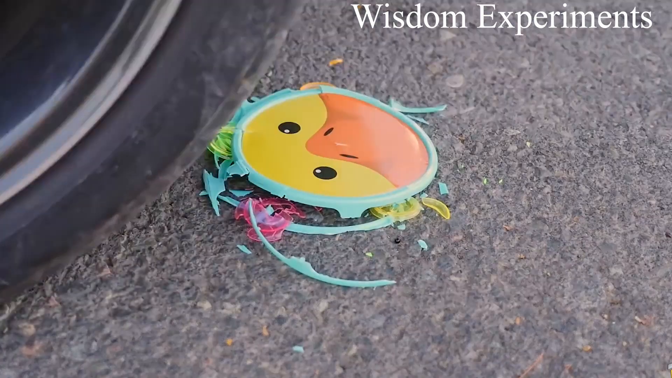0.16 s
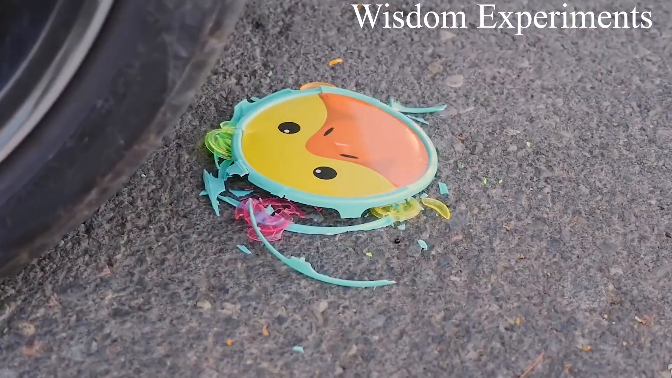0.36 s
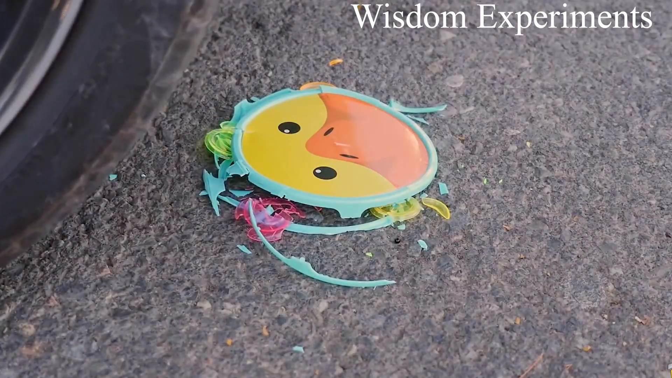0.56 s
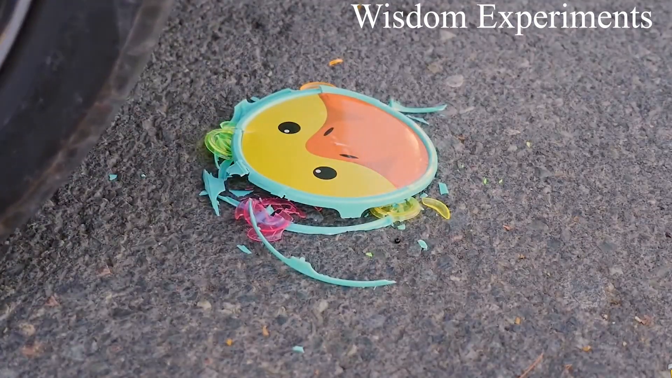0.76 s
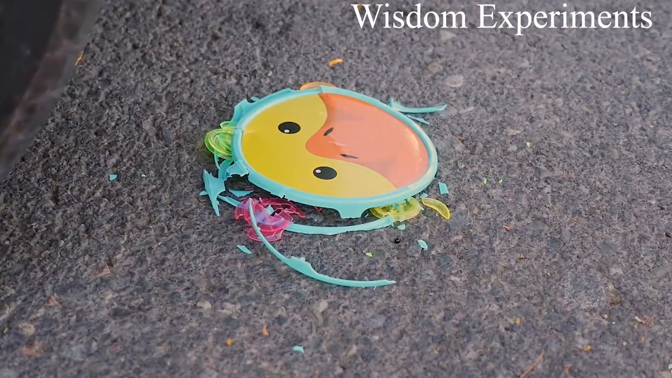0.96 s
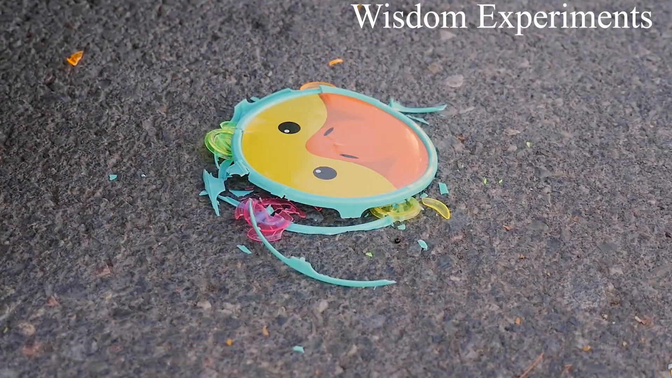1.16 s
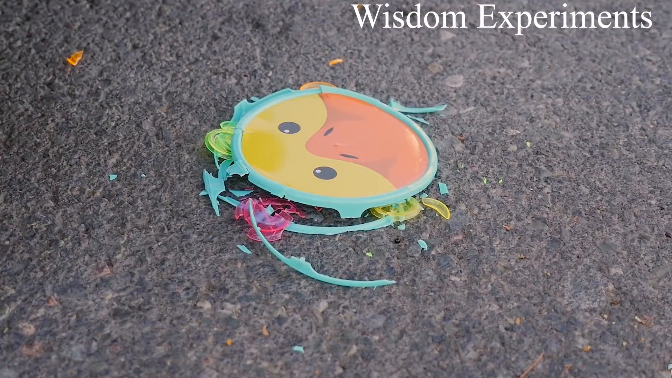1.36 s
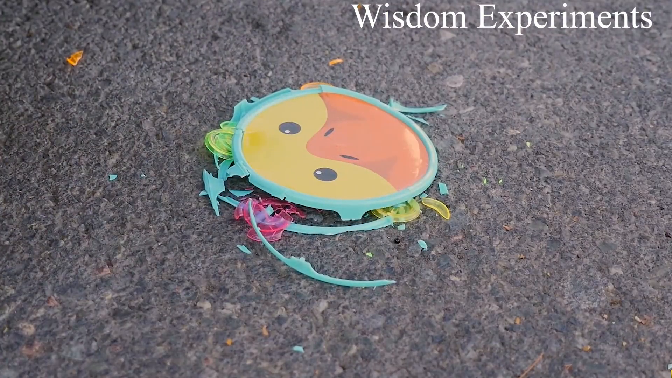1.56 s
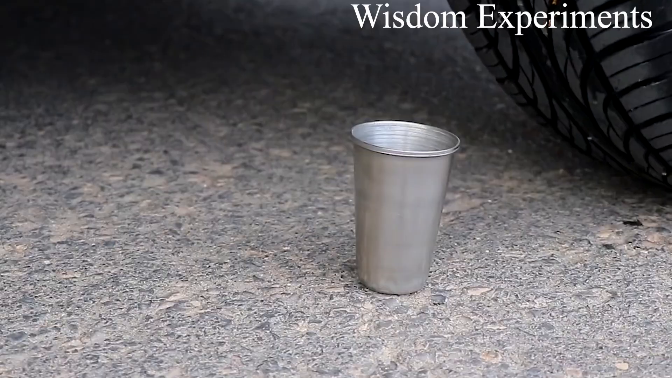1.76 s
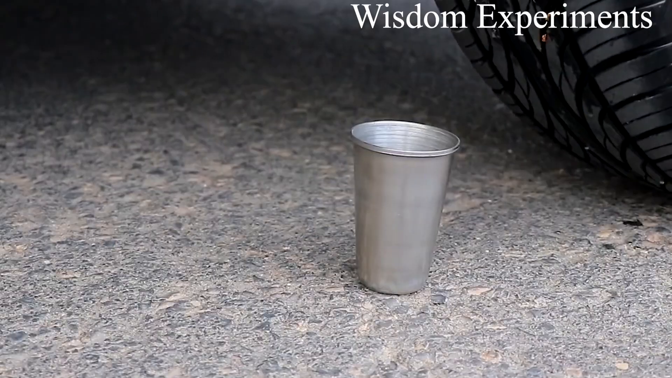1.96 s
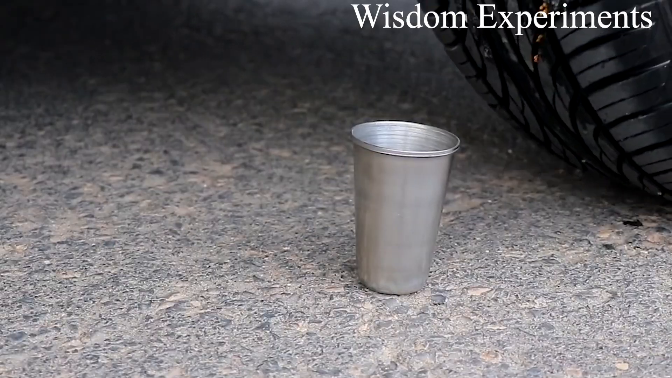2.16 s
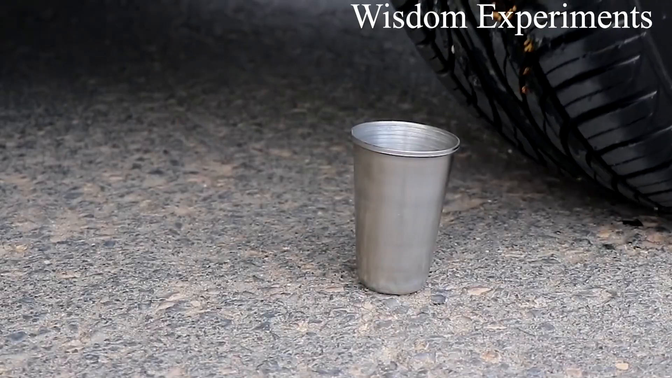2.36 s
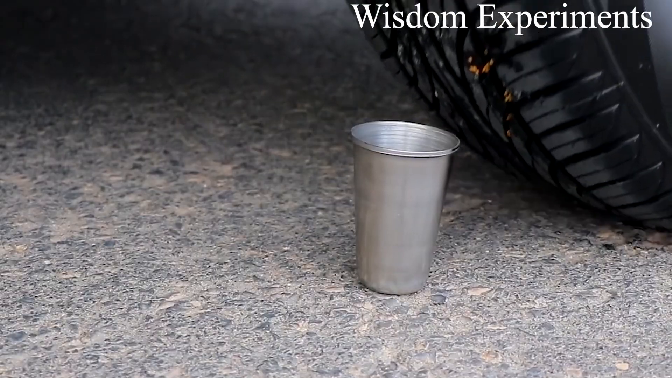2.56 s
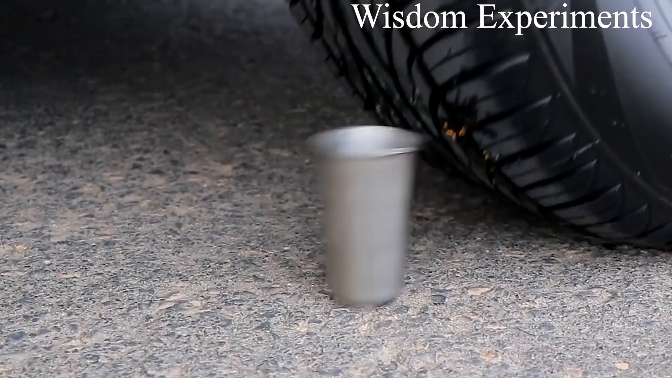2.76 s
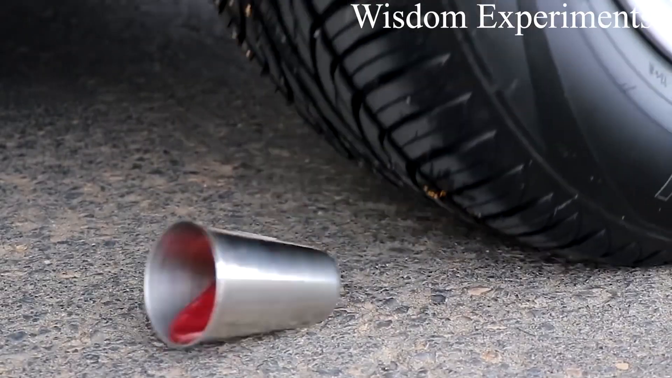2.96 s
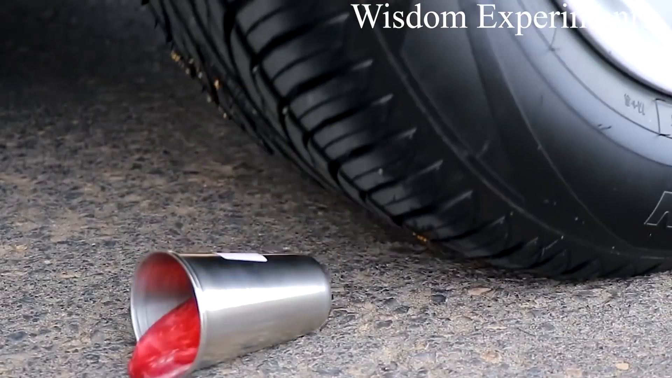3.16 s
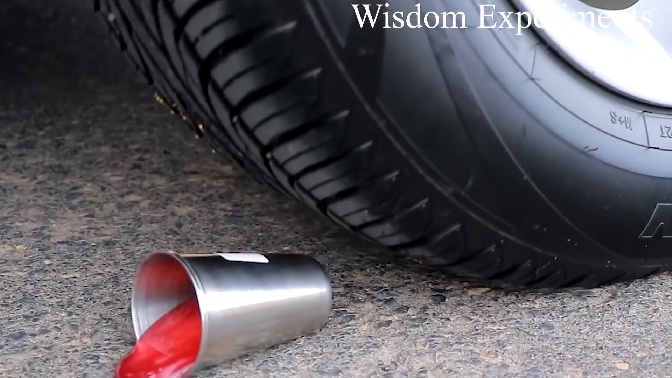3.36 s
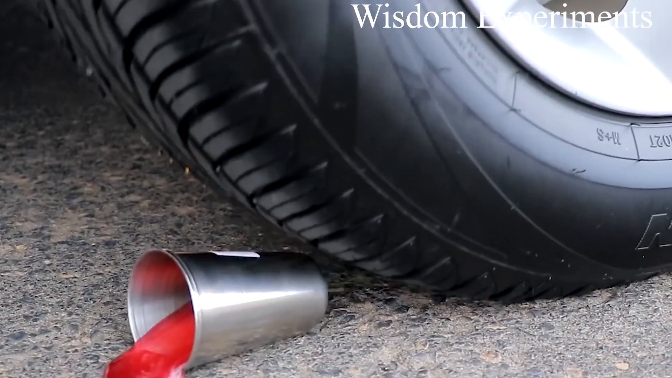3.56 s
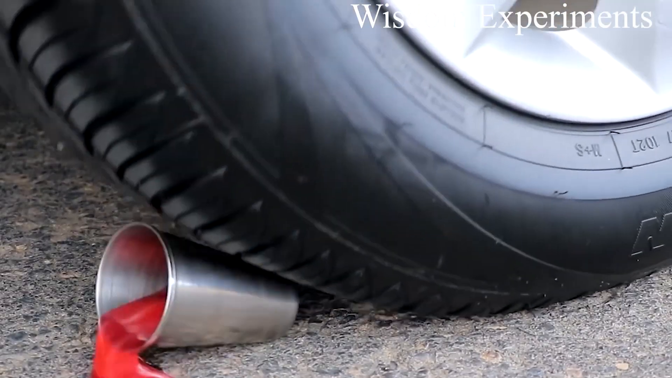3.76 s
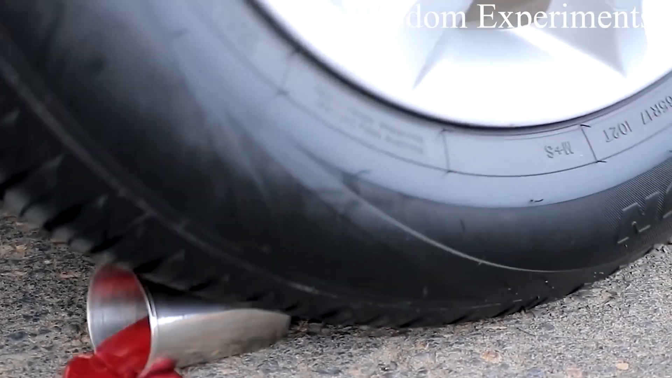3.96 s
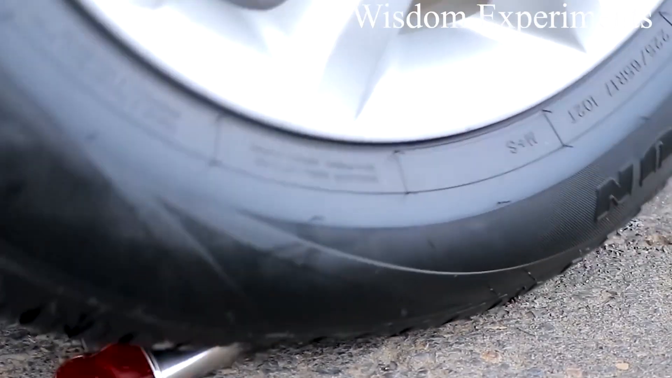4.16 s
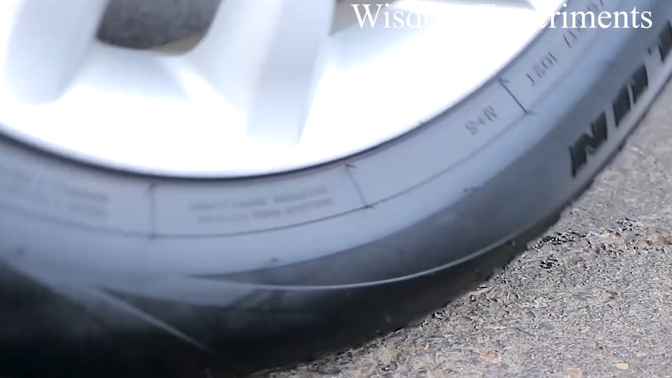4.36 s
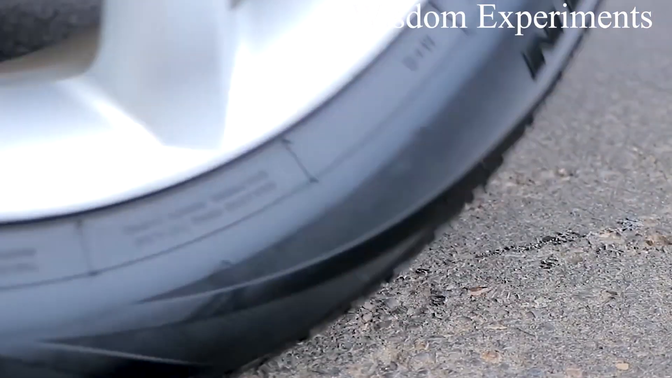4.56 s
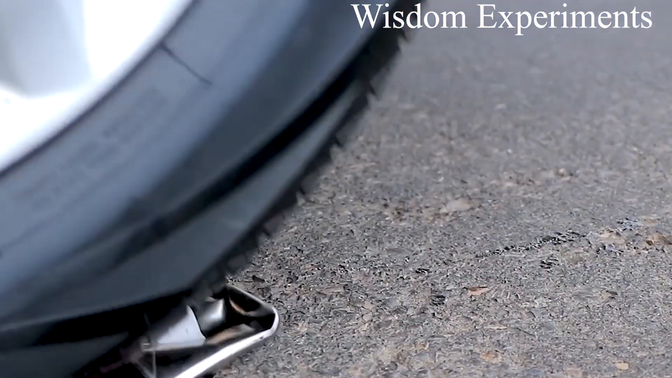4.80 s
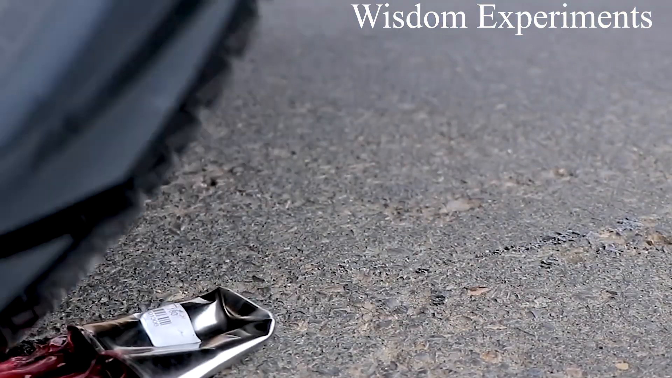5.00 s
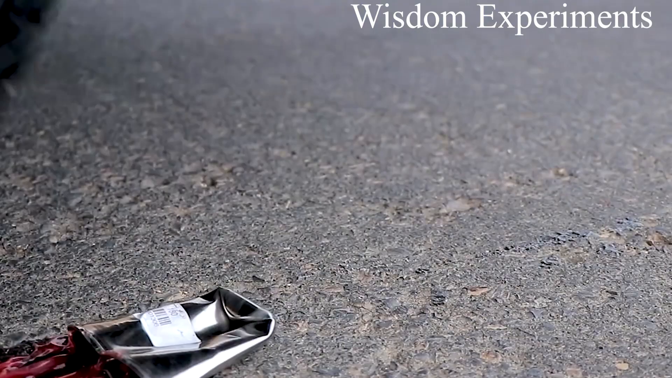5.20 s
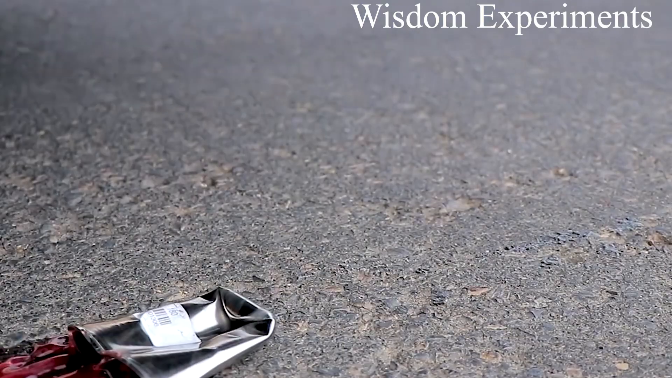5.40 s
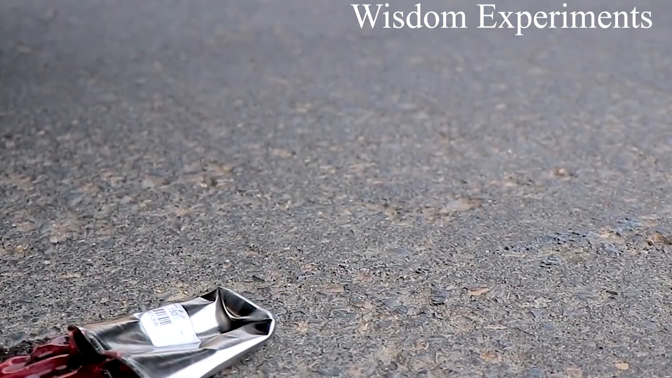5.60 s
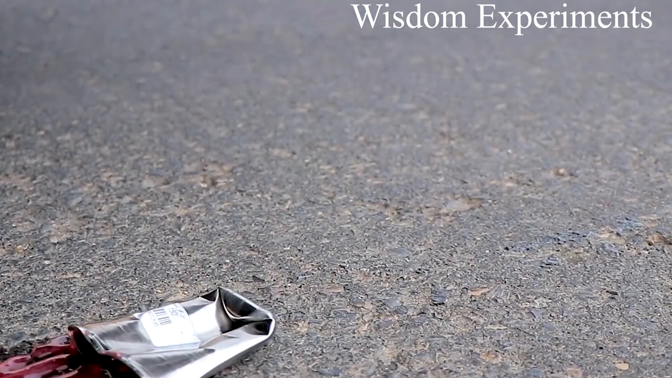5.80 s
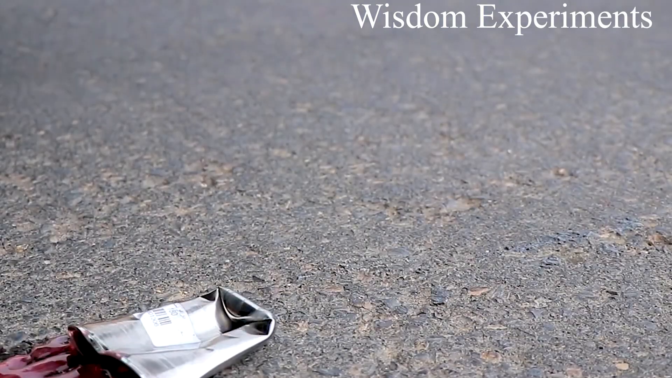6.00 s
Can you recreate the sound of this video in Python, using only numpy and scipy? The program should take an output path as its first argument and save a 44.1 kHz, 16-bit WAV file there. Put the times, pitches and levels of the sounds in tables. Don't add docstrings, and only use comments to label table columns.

```python
import sys
import numpy as np
from scipy import signal
from scipy.fft import rfft, irfft, next_fast_len
from scipy.io import wavfile
from scipy.ndimage import uniform_filter1d, map_coordinates

SR = 44100
rng = np.random.default_rng(int(sys.argv[2]) if len(sys.argv) > 2 else 0)


def output_pcm(signal):
    pcm = np.clip(np.atleast_2d(signal).T, -1, 1) * 32767
    wavfile.write(sys.argv[1], SR, np.round(pcm).astype(np.int16))


def natural_amplitude(level_db):
    exponent = np.asarray(level_db, float) / 20
    return 10 ** exponent


N = 266364
T = np.arange(N) / SR
SCENE_CHANGE = 1.712


def unit(x):
    return x / np.sqrt(np.mean(x ** 2) + 1e-20)


def curve(rows, column=1):
    rows = np.asarray(rows)
    return np.interp(T, rows[:, 0], rows[:, column], left=-120, right=-120)


def per_scene(first, second):
    return np.where(T < SCENE_CHANGE, first, second)


def peak(s, db, rise, fall):
    return db - np.where(T < s, rise * (s - T), fall * (T - s))


def wobble(rate):
    return map_coordinates(rng.standard_normal(int(N * rate / SR) + 4), [T * rate])


def filtered(x, response):
    m = next_fast_len(len(x) + 8192)
    return irfft(rfft(x, m) * response(np.fft.rfftfreq(m, 1 / SR)), m)[:len(x)]


def low_pass(f, hz):
    return 1 / (1 + 1.4j * f / hz - (f / hz) ** 2) ** 2


def rush(points, patchy_db=0):
    hz, level = np.transpose(points)
    z = signal.stft(rng.standard_normal(N), nperseg=512)[2]
    patches = uniform_filter1d(rng.standard_normal(z.shape), 4, axis=0)
    patches = uniform_filter1d(patches, 12, axis=1)
    noise = signal.istft(z * natural_amplitude(patchy_db * unit(patches)), nperseg=512)[1][:N]
    return unit(filtered(noise, lambda f: natural_amplitude(np.interp(np.log(f + 1), np.log(hz), level))))


def resonant(x, peaks):
    def response(f):
        total = 0
        for k, (center, width, db) in enumerate(peaks):
            band = 1j * f * width
            total = total + (-1) ** k * natural_amplitude(db) * band / (center * center - f * f + band)
        return total
    return filtered(x, response)


def ring(hz, db, t60, attack, rough_db=0):
    t = np.arange(round(SR * np.max(t60)))[:, None] / SR
    knots = rng.standard_normal((100, len(hz)))
    flutter = np.array([np.interp(t[:, 0] * 120, np.arange(100), k) for k in knots.T]).T
    sines = natural_amplitude(db - 60 * t / t60 + rough_db * flutter) * np.sin(2 * np.pi * hz * t)
    return sines.sum(1) * (1 - np.exp(-t[:, 0] / attack))


def crack(lo_hz, hi_hz, t60, tail_db=-16, attack=.0012):
    t = np.arange(SR // 6) / SR
    fade = natural_amplitude(-60 * t / t60) + natural_amplitude(tail_db - 60 * t / (3.1 * t60))
    burst = fade * (1 - np.exp(-t / attack)) * rng.standard_normal(len(t))
    x = filtered(burst, lambda f: (1j * f / (lo_hz + 1j * f)) ** 2 * low_pass(f, hi_hz))
    return x / np.abs(x).max()


def add(track, s, x):
    part = track[max(round(s * SR), 0):][:len(x)]
    part += x[:len(part)]


def shards():
    # [t/s, level/dB]
    rustle = [
        (0, -28),
        (.02, -31),
        (.04, -31),
        (.055, -31),
        (.072, -38),
        (.12, -42),
        (.14, -45),
        (.17, -55),
        (.24, -70),
    ]
    # [f/Hz, density/dB per Hz]
    plastic = [(88, -23.5), (150, -3.5), (205, -12), (346, 4), (373, 8), (404, -6), (2020, -11.5),
               (2230, 1), (2550, -4.5), (5330, -0.5), (15500, -9)]
    # [t/s, peak level/dB, low part level/dB]
    snaps = [
        (.0005, -28, 6),
        (.0085, -28, 4),
        (.0412, -12, -18),
        (.0745, -32, -10),
        (.091, -30, -10),
        (.099, -30, -12),
        (.1262, -23, -18),
        (.1485, -36, -18),
    ]
    out = natural_amplitude(curve(rustle) - 3.5 + 0.62 * wobble(100)) * rush(plastic)
    for s, db, low_db in snaps:
        snap = crack(5400, 23000, .01, tail_db=-18.0) + natural_amplitude(-6.0) * crack(4500, 6300, 0.016)
        add(out, s, natural_amplitude(db) * (snap + natural_amplitude(low_db) * crack(160, 2850, 0.081)))
    return out


def engine():
    # [f/Hz, width/Hz, level/dB]
    bands = [(556, 14, -70.5), (2150, 56, -69), (3750, 80, -80.5), (6100, 190, -81), (8100, 210, -88),
             (10100, 580, -86), (12000, 700, -80)]
    firings = (31 - 2.1 * T / 2) * T
    chug_db = 5 * np.cos(2 * np.pi * firings + 0.81 * wobble(4))
    out = np.zeros(N)
    for hz, width, db in bands:
        level_db = db + 1.4 * wobble(3.8) + (hz > 3000) * chug_db
        out += natural_amplitude(level_db) * unit(resonant(rng.standard_normal(N), [(hz, width, 0)]))
    return (T < SCENE_CHANGE) * out


def tread_level():
    # [t/s, level/dB]
    tread = [
        (1.712, -61),
        (2.7, -71.5),
        (2.9, -63),
        (3.5, -73),
        (4.1, -60.5),
        (4.7, -67),
        (5.3, -73.5),
        (5.6, -67),
        (6.1, -74.5),
    ]
    return per_scene(-66.5, curve(tread))


def road(tread_db):
    # [f/Hz, density/dB per Hz]
    yard = [(35, -57), (60, 2.5), (127, 0), (301, -5.5), (408, -4.5), (458, -5.5), (566, -2.5),
            (903, -10.5), (1620, -8.5), (1910, -17.5), (2050, -14.5), (2970, -15), (3420, -23.5),
            (11800, -39.5), (16000, -47)]
    # [f/Hz, density/dB per Hz]
    street = [(35, -28), (60, 3), (168, -14), (281, -11), (408, -13.5), (732, -13.5), (1200, -16),
              (1620, -22), (2250, -21.5), (2770, -26), (3190, -25.5), (5330, -29), (11300, -45.5),
              (14900, -46.5), (16000, -48)]
    first = T < SCENE_CHANGE
    body = per_scene(rush(yard, patchy_db=0.9), rush(street, patchy_db=2.0))
    low = filtered(body, lambda f: 1 / (1 + (f / 3200) ** 4) / (1 + (90 / (f + 1)) ** 4))
    high = filtered(body, lambda f: 1 - 1 / (1 + (f / 3200) ** 4))
    low = low / per_scene(low[first].std(), low[~first].std())
    high = high / per_scene(high[first].std(), high[~first].std())
    rush_db = per_scene(-60, -51.5) + 0.55 * wobble(4.7) + 0.53 * wobble(1.3)
    return natural_amplitude(rush_db) * low + natural_amplitude(tread_db) * high


def microphone_noise(tread_db):
    # [f/Hz, density/dB per Hz]
    hiss = [(2500, -30), (6000, 6.5), (9000, -10), (12500, -1.5), (14000, -5), (15700, -2), (16000, -39.5)]
    noise_db = per_scene(-85, -82.5) + .25 * (tread_db - tread_db.mean())
    return natural_amplitude(noise_db + .8 * wobble(9)) * rush(hiss)


def wind():
    # [f/Hz, density/dB per Hz]
    buffet = [(8.8, -26.5), (15, 3), (27, 0), (44, -4), (97, -19), (200, -31.5), (260, -42.5), (440, -120)]
    # [peak t/s, peak level/dB, half-length/s]
    gusts = [(0, -63, .15), (1.746, -38, 0.085), (2.13, -50.5, 0.25), (2.433, -45.5, 0.081),
             (2.488, -31, 0.11), (2.606, -37.5, 0.18), (2.76, -34, 0.029), (2.833, -33, 0.086),
             (2.927, -43, 0.097), (3.177, -41, 0.17), (3.282, -30.5, 0.13), (3.386, -37, 0.041),
             (3.45, -34, 0.057), (3.536, -44, 0.094), (3.635, -32.5, 0.079), (3.804, -33, .13),
             (4.08, -50, .15), (4.272, -37, .11), (4.388, -43, 0.14), (4.67, -40.5, .16), (4.82, -39, 0.13),
             (5.214, -45.5, 0.23), (5.484, -53, .12), (5.706, -38, 0.079), (5.811, -41, 0.089),
             (5.92, -38, 0.075), (6.02, -46, .1)]
    strength = natural_amplitude(per_scene(-84, -66.5))
    for s, db, half in gusts:
        same_scene = (T < SCENE_CHANGE) == (s < SCENE_CHANGE)
        strength = strength + natural_amplitude(db - 35 * ((T - s) / half) ** 2) * same_scene
    lumps = natural_amplitude(1.5 * wobble(14))
    return strength * unit(lumps * rush(buffet))


def background():
    tread_db = tread_level()
    dip = 1 - 0.74 * np.exp(-((T - SCENE_CHANGE - .008) / 0.0081) ** 2)
    return dip * (wind() + road(tread_db) + engine() + microphone_noise(tread_db))


def rattle():
    start, gap, shrink = 3.2074, .0165, .91
    touches = []
    for k in range(8):
        touches.append((start + gap * (1 - shrink ** k) / (1 - shrink), -28 - 0.26 * k ** 2))
    return touches


def bounces():
    # [t/s, peak level/dB, main notes level/dB, upper notes level/dB, bright crack level/dB]
    bounce_rows = [(2.8559, -5.5, -21, -13, -24), (2.8604, -9, -24.5, -12, -28),
                   (2.8988, -17, -6.5, -16.5, -29), (2.9068, -14, -12.5, -13, -38),
                   (2.9347, -16, -20.5, -7.5, -29.5), (2.9627, -15.5, -20.5, -12, -40),
                   (2.9926, -22, -20, -15, -20.5), (3.015, -25, -5.5, -17, -37),
                   (3.0574, 0.5, -10.5, -17, -3), (3.1298, -11.5, -12.5, -7.5, 0.5),
                   (3.1692, -14.5, -12.5, -8, -1)]
    # [f/Hz, level/dB, 60 dB decay time/s]
    tipping = [(569, -8.5, 0.21), (910, -5, 0.023), (1353.5, -7.5, 0.38), (1785, 10.5, 0.0073),
               (2100, 4, .03), (2199, 9, 0.012), (2320, 3, 0.037), (2565, -19, 0.071), (3250, -25.5, 0.16),
               (3320, -9.5, .04)]
    # [f/Hz, level/dB, 60 dB decay time/s]
    lying = [(541, -30.5, 1), (1090, -25.5, 0.64), (1380, -6.5, 0.14), (1690, -19.5, 0.11),
             (1900, -12.5, 0.22), (2270, -8.5, 0.24), (2390, -14.5, 0.14), (2450, -5.5, 0.099),
             (2980, -12, 0.14), (3285, -9.5, .12), (3590, -9, 0.086), (4090, -4.5, 0.068),
             (4770, -8.5, 0.045), (5100, -13.5, 0.062)]
    fall = 3.05
    out = np.zeros(N)
    touches = list(bounce_rows) + [(*row, -9.5, -7, -24) for row in rattle()]
    next_touch = [row[0] for row in touches[1:]] + [9]
    for (s, db, main_db, upper_db, bright_db), after in zip(touches, next_touch):
        hz, level, t60 = np.transpose(tipping if s < fall else lying)
        strength = np.where(hz < 1500, main_db + 4.5, upper_db) + 0.98 * rng.standard_normal(len(hz))
        hz = hz * (1 - 0.21 * max(s - fall, 0) * (hz < 1500))
        hz = hz * (1 + 0.005 * rng.standard_normal(len(hz)))
        tone = ring(hz, level + strength, t60, attack=0.00024, rough_db=3.0)
        damped_s = np.maximum(np.arange(len(tone)) / SR - (after - s), 0)
        add(out, s, natural_amplitude(db - 53 * damped_s) * tone)
        add(out, s, natural_amplitude(db - 4.5) * crack(1200, 2800, 0.012, attack=0.00025))
        edge = crack(3800, 6400, 0.016, tail_db=-14.5, attack=0.00028)
        add(out, s, natural_amplitude(db + bright_db) * edge)
        add(out, s, natural_amplitude(db + bright_db - 17.5) * crack(7700, 12000, 0.004))
    return out


def grit(per_second, spread_db):
    size = natural_amplitude(spread_db * rng.standard_normal(N)) * np.sign(rng.standard_normal(N))
    impacts = (rng.random(N) < per_second / SR) * size
    return unit(unit(impacts) + .5 * rng.standard_normal(N))


def scrape():
    # [f/Hz, width/Hz, level/dB]
    loose = [(508, 61, -0.5), (1330, 240, 1), (2160, 180, -8.5), (3085, 160, -0.5), (4200, 100, -17.5),
             (5100, 810, -16.5)]
    # [f/Hz, width/Hz, level/dB]
    skidding = [(800, 120, -8), (1150, 110, 3), (1400, 110, -2), (3520, 90, 1), (4500, 500, -16)]
    # [f/Hz, width/Hz, level/dB]
    pinned = [(1050, 140, 11), (1400, 220, 8), (692, 220, -5), (3640, 380, -13), (5300, 440, -7.5)]
    # [f/Hz, width/Hz, level/dB]
    folded = [(645, 110, 1.5), (1050, 460, -6), (2300, 110, -4.5), (4630, 2700, -20.5)]
    # [f/Hz, width/Hz, level/dB]
    flat = [(895, 38, 9.5), (1300, 240, -6.5), (1520, 77, 1.5), (2380, 190, -14), (3260, 140, -13),
            (5000, 370, -15.5)]
    # [peak t/s, peak level/dB, rise/dB per s, fall/dB per s]
    strokes = [
        (3.2, -38.5, 106, 110),
        (3.813, -17, 329, 1208),
        (4.94, -29, 896, 153.5),
        (5.82, -43.5, 602.5, 330),
    ]
    # [t/s, level/dB]
    load = [
        (3.81, -47),
        (3.84, -36),
        (3.93, -49),
        (4.05, -46.5),
        (4.3, -39.5),
        (4.5, -48),
        (4.64, -49),
        (4.8, -43),
        (4.915, -39.5),
    ]
    rolling_db, shoved_db, sprung_db, settling_db = (peak(*row) for row in strokes)
    rolling_db = rolling_db - 450 * np.maximum(T - 3.31, 0)
    shoved_db = shoved_db - 1500 * np.maximum(3.76 - T, 0)
    load_db = curve(load)
    half_folded = T >= 4.17
    stages = [(rolling_db, loose, -28.5), (shoved_db, skidding, -22),
              (np.where(half_folded, -120, load_db), pinned, -32),
              (np.where(half_folded, load_db, -120), folded, -32.5),
              (sprung_db, flat, -20), (settling_db, flat, -31)]
    out = np.zeros(N)
    for level_db, peaks, rasp_db in stages:
        grains = grit(per_second=1300, spread_db=3.5)
        body = filtered(unit(resonant(grains, peaks)), lambda f: low_pass(f, 7900))
        rasp = unit(filtered(grains, lambda f: 1j * f / (2000 + 1j * f) * low_pass(f, 6500)))
        out += natural_amplitude(level_db + 0.83 * wobble(60)) * (body + natural_amplitude(rasp_db) * rasp)
    return out


def grit_ticks():
    # [t/s, peak level/dB]
    grains = [(3.6755, -48.5), (3.8448, -56), (3.8535, -52), (3.8626, -37.5), (3.8808, -59), (3.8917, -41),
              (3.921, -51), (3.9336, -42), (3.9629, -34.5), (3.9976, -38.5), (4.0204, -22), (4.0423, -32.5),
              (4.0647, -28.5), (4.0831, -29), (4.1149, -41), (4.1207, -52), (4.133, -31), (4.1433, -42.5),
              (4.1795, -26.5), (4.2585, -32), (4.545, -43.5), (4.6688, -46), (4.687, -39.5)]
    # [start t/s, end t/s, level/dB]
    crunches = [
        (3.996, 4.176, -41),
        (4.655, 4.76, -43.5),
    ]
    ticks = [(s, db - 4) for s, db in rattle()] + list(grains)
    for start, end, db in crunches:
        for u, v in rng.random(size=(12, 2)):
            ticks.append((start + (end - start) * u, db - 9 * v))
    out = np.zeros(N)
    for s, db in ticks:
        top_hz = 5800 if s < 3.95 else 7000
        sparkle = np.gradient(np.gradient(crack(13000, 15000, .008)))
        add(out, s, natural_amplitude(db) * (crack(3500, top_hz, 0.011) + natural_amplitude(-16) * sparkle))
    return out


def buckles():
    # [t/s, crack peak level/dB, dent f/Hz, dent level/dB, bright level/dB]
    shoved = [
        (3.792, -18.5, 1170, 11.5, -12),
        (3.7991, -18, 1100, 14, -30),
        (3.8066, -17, 1300, 7.5, -22),
        (3.8147, -25, 1090, 19, -23),
    ]
    # [t/s, crack peak level/dB, dent f/Hz, dent level/dB, bright level/dB]
    folding = [(3.9629, -40.5, 610, -0.5, 2), (3.9758, -34, 1330, -6, -4), (4.025, -29, 1218, -4, -21),
               (4.0549, -27.5, 1050, -3, -3), (4.1826, -2.5, 1314, -18.5, -24),
               (4.2363, -11, 1040, 0, -24.5), (4.264, -2, 1210, -36, -12), (4.3055, -11.5, 1157, 6, -52),
               (4.3368, -20, 1400, -25, -18), (4.367, -13, 570, -14, -35.5), (4.371, -14, 970, -16, -17.5),
               (4.3959, -4, 991, 4.5, -13), (4.4116, -24, 878, 2.5, -11), (4.4425, -10, 637, 0, -33),
               (4.4535, 2, 729, 4, -24.5), (4.6527, -29, 756, -6, -23), (4.7073, -30.5, 1410, -5.5, -20),
               (4.7244, -27.5, 1170, -12, -28), (4.7578, -23.5, 1200, 5.5, -31.5),
               (4.7674, -9, 1170, 10, -43.5), (4.822, -41, 1140, 8.5, -21.5)]
    # [t/s, crack peak level/dB, dent f/Hz, dent level/dB, bright level/dB]
    sprung = [(4.8986, -20.5, 1390, -3, -34.5), (4.9155, -12, 1300, 3, -18.5), (4.9188, 3, 998, -11, -26),
              (4.9231, -1.5, 1400, 3.5, -22), (4.9311, -9, 975, -5.5, -23.5),
              (4.9639, -15.5, 1200, 0, -26.5), (4.9959, -17.5, 1505, -7, -31.5),
              (5.015, -27, 1400, -6, -24), (5.0294, -26, 1282, -3.5, -34), (5.7354, -51.5, 646, 20, -21),
              (5.8147, -41, 1034, 13.5, -25)]
    # [t/s, f/Hz, note level/dB, 60 dB decay time/s]
    pop_rows = [
        (4.028, 3920, -35, 0.056),
        (4.0849, 1090, -6.5, 0.03),
        (4.183, 550, -15.5, 0.031),
        (4.184, 1714, -3.5, 0.019),
        (4.39, 783, 0, 0.029),
        (4.408, 960, -28, .06),
        (4.922, 5000, -4, 0.015),
        (4.923, 1672, -8, 0.034),
        (4.923, 3250, -16, 0.066),
    ]
    flattened, at_rest = 4.85, 5.5
    events = []
    for rows, full_t60 in [(shoved, 0.004), (folding, 0.013), (sprung, 0.026)]:
        for s, db, hz, dent_db, bright_db in rows:
            t60 = full_t60 * natural_amplitude(-0.81 * (db + dent_db))
            events.append((s, db, hz, dent_db, bright_db, t60, .0012))
    for s, hz, db, t60 in pop_rows:
        swell = .005 if s < flattened else .001
        events.append((s, db - 18, hz, 18, -12.5, t60, swell))

    out = np.zeros(N)
    for s, db, hz, dent_db, bright_db, t60, attack in events:
        t60 = min(t60, .015 if s > at_rest else 0.056)
        near_hz = hz * np.exp(np.clip(0.16 * rng.standard_normal(4), -.3, .4))
        near_db = np.array([-13, -14, -15, -16]) + 7 * (s > flattened)
        note = ring(np.r_[hz, near_hz], np.r_[0, near_db], abs(t60) + 0.0044, attack=attack, rough_db=-4.2)
        edge_hz = np.clip(5500 * natural_amplitude(0.17 * bright_db), 1800, 9000)
        add(out, s, natural_amplitude(db + dent_db) * note)
        add(out, s, natural_amplitude(db - 1.0) * crack(800 if s < flattened else 1200, edge_hz, 0.0094))
        add(out, s, natural_amplitude(db + bright_db) * crack(3600, 12500, 0.0018))
        if s > flattened:
            add(out, s, natural_amplitude(db - 8) * crack(2000, 3100, 0.023))
        else:
            add(out, s, natural_amplitude(db + dent_db - 16.0) * crack(450, 1800, 0.042))
    return out


def underbody(x):
    t = np.arange(SR // 3) / SR
    slow, quick = rng.standard_normal((2, len(t))) * natural_amplitude(-60 * t / np.array([[.14], [.05]]))
    slow = filtered(slow, lambda f: 1 / (1 + 1j * f / 2500))
    tail = slow / np.linalg.norm(slow) + .5 * quick / np.linalg.norm(quick)
    return signal.fftconvolve(x, np.pad(tail, (130, 0)))[:N]


def scene():
    hits = bounces() + grit_ticks() + buckles()
    return (shards() + background() + hits + natural_amplitude(-21.5) * underbody(hits) + scrape())[None]


def band_limit(x):
    return signal.sosfilt(signal.butter(12, 16710, fs=SR, output="sos"), x)


def record(dry):
    top = .99
    dull = filtered(dry[0], lambda f: 1 / (1 + (f / 16100) ** 30))[None]
    clipped = dull / (1 + np.abs(dull / top) ** 8) ** (1 / 8)
    return band_limit(clipped)


dry = scene()
out = record(dry)
output_pcm(out)
```